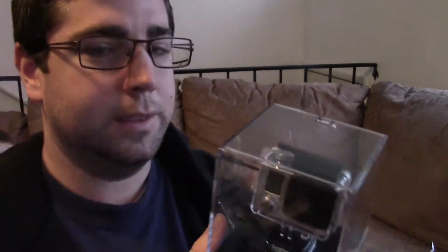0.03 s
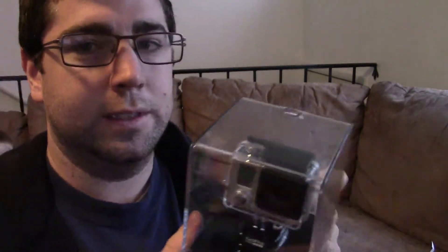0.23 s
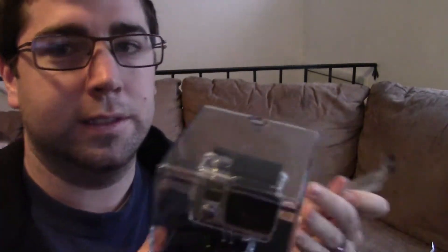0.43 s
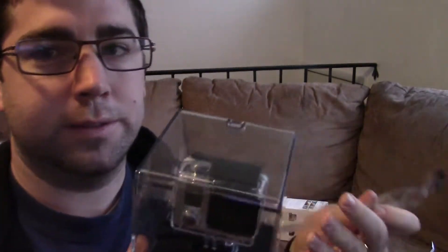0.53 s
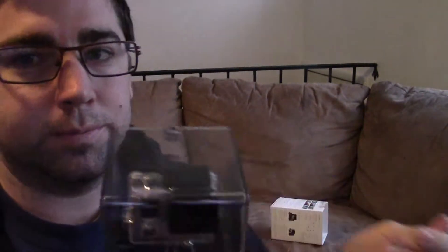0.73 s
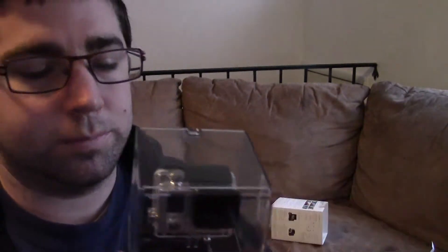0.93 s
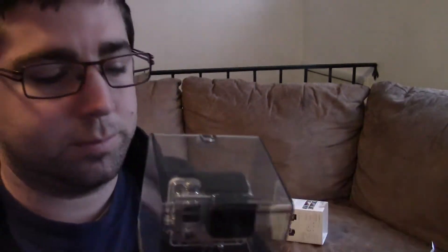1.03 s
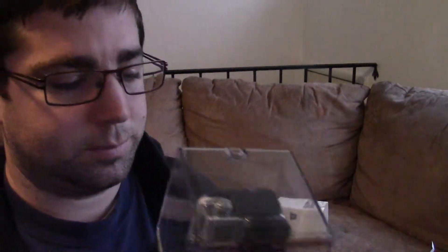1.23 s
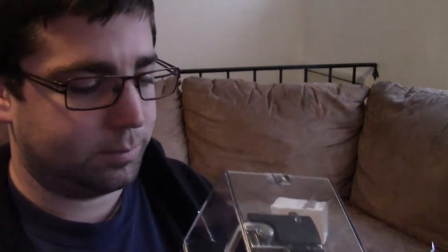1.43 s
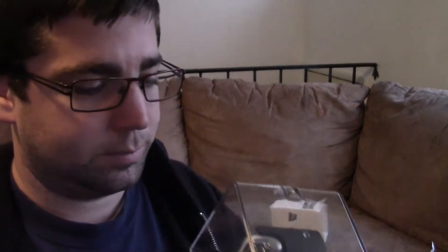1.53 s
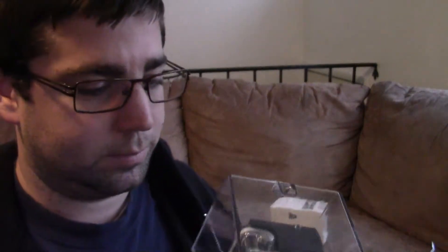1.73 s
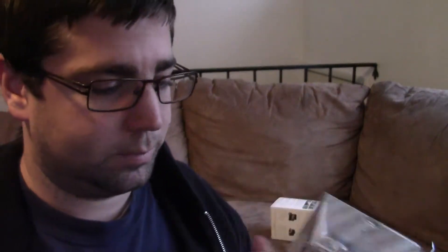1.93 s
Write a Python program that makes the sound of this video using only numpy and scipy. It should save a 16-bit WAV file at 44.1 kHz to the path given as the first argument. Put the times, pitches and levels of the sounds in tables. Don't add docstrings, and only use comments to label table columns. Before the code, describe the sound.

Sticky tape tears off a hollow hard plastic case, close up in a quiet furnished room. Faint ticks and rubbing lead to two crackling, drumming pulls at 0.23-0.37 and 0.40-0.60 seconds. The hardest, brightest rip comes at 0.73-0.82, then a loud hollow knock at 0.85 and smaller ones. A sharp tick at 1.07, sparse clicks, a ringing tap near 1.59 and faint touches follow over soft room air.

```python
import sys
import numpy as np
from scipy import signal
from scipy.fft import rfft, irfft
from scipy.io import wavfile

SR = 44100
rng = np.random.default_rng(int(sys.argv[2]) if len(sys.argv) > 2 else 0)


def transcribe(u):
    v = np.clip(np.atleast_2d(u).T, -1, 1)
    q = np.round(v * 32767).astype(np.int16)
    wavfile.write(sys.argv[1], SR, q)


def voltage_ratio(decibels):
    exponent = np.asarray(decibels, float) / 20
    return 10 ** exponent


N = 88200


def along(points, hz):
    f, v = np.transpose(points)
    return np.interp(np.log(hz + 1), np.log(f + 1), v)


def unit(x):
    return x / np.sqrt(np.mean(x ** 2) + 1e-20)


def colour(x, points):
    gain = voltage_ratio(along(points, np.fft.rfftfreq(4096, 1 / SR)))
    cepstrum = irfft(np.log(gain + 1e-6))
    cepstrum[1:2048] *= 2
    cepstrum[2049:] = 0
    impulse = irfft(np.exp(rfft(cepstrum)))
    return signal.fftconvolve(x, impulse)[:N]


def control(rows, level_db):
    time_s = np.asarray(rows)[:, 0] if not isinstance(rows, list) else np.array([r[0] for r in rows])
    return voltage_ratio(np.interp(np.arange(N) / SR, time_s, level_db, left=-120, right=-120))


def grains(rate_per_s, spread_db):
    hit = rng.random(N) < rate_per_s / SR
    size = voltage_ratio(spread_db * rng.standard_normal(N))
    return unit(hit * rng.choice([-1, 1], size=N) * size)


def crackle(rate_per_s, tone):
    t = np.arange(SR // 200) / SR
    decay = voltage_ratio(-60 * t / 0.005)
    sprays = np.convolve(np.abs(grains(rate_per_s, 4)), decay)[:N]
    return unit(colour(sprays * rng.standard_normal(N), tone))


# pitch_hz, level_db, t60_s
CASE_MODES = [(309, 7.5, .07), (363.6, 9.5, 0.1), (454.5, 10, 0.13), (616, 5.5, 0.13), (795, -5.5, 0.027),
              (880, -10.5, 0.046), (1180, -24.5, 0.039), (1540, 2, .025), (2200, -5.5, .015)]


def ring(tilt_db_per_octave, scatter_db):
    t = np.arange(SR // 5) / SR
    x = np.zeros(len(t))
    for k, (hz, db, t60_s) in enumerate(CASE_MODES):
        tilt_db = tilt_db_per_octave * np.log2(hz / 500)
        level_db = db + tilt_db + scatter_db * rng.standard_normal()
        x += (-1) ** k * voltage_ratio(level_db - 60 * t / t60_s) * np.sin(2 * np.pi * hz * t)
    return x / np.linalg.norm(x)


# freq_hz, gain_db
WALL_GAIN = [(60, -20.5), (200, -6.5), (300, 0.5)]


def thin_walls(x):
    return colour(x, WALL_GAIN)


# freq_hz, level_db_per_hz
AIR_COLOUR = [(20, -64.5), (55, -27.5), (134, -16), (285, -12), (1070, -15.5), (2000, -17), (4000, -33),
              (9000, -41), (16000, -51.5)]
# freq_hz, likeness
AIR_LIKENESS = [(60, 0.88), (240, 0.96), (950, 0.98), (3770, 0.93), (15000, 0.43)]
# time_s, level_db
AIR_SETTLE = [
    (0, 1.74),
    (1.62, -0.94),
    (1.75, -4),
    (2.1, -2),
]


def air():
    pair = np.array([unit(colour(v, AIR_COLOUR)) for v in rng.standard_normal((2, N))])
    likeness = along(AIR_LIKENESS, np.fft.rfftfreq(N, 1 / SR))
    turn = np.arccos(np.clip(likeness, -1, 1)) / 2
    mid, side = irfft(rfft(pair) * [np.cos(turn), np.sin(turn)], N)
    level = voltage_ratio(-51) * control(AIR_SETTLE, np.transpose(AIR_SETTLE)[1])
    return level * np.array([mid + side, mid - side])


def fidget():
    touches = grains(120, 2.5)
    return voltage_ratio(-59) * thin_walls(signal.fftconvolve(touches, ring(-1.5, 0))[:N])


# start_s, peak_db, pitch_hz
TICK_EVENTS = [(0.0356, -44, 4200), (0.0768, -41.5, 3520), (.094, -41.5, 7500), (.16, -44.5, 7500),
               (1.0713, -20.5, 8220), (1.0712, -25.5, 12500), (1.083, -37.5, 5380), (1.112, -38, 3480),
               (1.1197, -31, 6840), (1.165, -38, 6120), (1.172, -40, 4030), (1.189, -40.5, 7260),
               (1.3217, -40.5, 7140), (1.34, -41.5, 7100), (1.3495, -40, 6660), (1.37, -44, 6950),
               (1.385, -36, 6730), (1.396, -34.5, 7160), (1.359, -43, 9000), (1.473, -46, 6000),
               (1.5087, -33, 5600), (1.582, -41, 3670), (1.591, -44, 3020), (1.62, -33, 7010),
               (1.635, -37, 2840), (1.843, -46.5, 2777), (1.994, -39.5, 7000)]


def ticks():
    thin_hz, t60_s, flake_cycles = 5000, 0.0034, 6.7
    out, t = np.zeros(N + SR), np.arange(SR // 50) / SR
    for start_s, peak_db, hz in TICK_EVENTS:
        flake = np.sin(2 * np.pi * hz * t) * voltage_ratio(-60 * t * hz / flake_cycles)
        if hz <= thin_hz:
            flake = np.convolve(flake, flake)
        burst = rng.standard_normal(len(t)) * voltage_ratio(-60 * t / t60_s)
        crack = np.convolve(burst, flake)[:len(t)]
        out[round(start_s * SR):][:len(t)] += voltage_ratio(peak_db) * crack / np.abs(crack).max()
    return out[:N]


# start_s, length_s, level_db
RUB_STROKES = [
    (0.178, 0.16, -48),
    (0.63, 0.37, -46),
    (0.924, 0.31, -59.5),
    (1.15, 0.48, -66.5),
    (1.151, 0.029, -52.5),
    (1.299, .12, -65),
    (1.452, 0.1008, -70),
    (1.558, 0.11, -54.5),
    (1.982, .06, -53.5),
]
# freq_hz, level_db_per_hz
SKIN_COLOUR = [(1470, -37), (2500, 8), (5650, -2), (6450, 1), (8080, -2.5), (10900, -3.5), (16000, -14.5)]


def rubbing():
    now_s, strokes = np.arange(N) / SR, np.zeros(N)
    for start_s, length_s, level_db in RUB_STROKES:
        progress = np.clip((now_s - start_s) / length_s, 0, 1)
        strokes += voltage_ratio(level_db) * np.sin(np.pi * progress)
    return strokes * crackle(4000, SKIN_COLOUR)


# time_s, crackle_db, drumming_rel_db
PULL_LEVELS = [
    [(.2345, -21, -17), (.25, -16.5, -8), (.315, -22, -8), (.342, -27.5, -10.5), (.37, -38, -5)],
    [(.3955, -16.5, -17), (.445, -26.5, 5), (.535, -20, -6.5), (.562, -29, -17.5), (.6, -37.5, -5.5)],
    [(.7315, -25, 0.5), (.745, -16, -14), (.758, -18.5, -12.5), (.768, -12.5, -19), (.795, -10, -13.5),
     (.808, -12, -15), (.818, -22, -7), (.85, -46.5, 11)],
]
# start_s, level_db
FIRST_SLIPS = [(0.2394, -13), (0.247, -15), (0.2559, -30), (0.2592, -8), (0.2699, -15.5), (0.2746, -17),
               (0.2775, -17.5), (0.2804, -25.5), (0.2835, -20), (0.287, -12), (0.2896, -21), (0.2946, -12),
               (0.305, -26.5), (0.3078, -17.5), (0.3106, -22.5), (0.3226, -26.5), (0.328, -19.5),
               (0.332, -17.5), (0.3354, -20.5), (0.3389, -18.5)]
SECOND_SLIPS = [(0.3969, -18), (0.402, -30.5), (0.4048, -23), (0.4077, -22), (0.4153, -15), (0.4193, -25.5),
                (0.4308, -25), (0.4375, -16.5), (0.4431, -18.5), (0.4555, -18.5), (0.4605, -26),
                (0.4666, -15), (0.4715, -20.5), (0.4742, -22.5), (0.481, -20.5), (0.4854, -16.5),
                (0.4895, -14.5), (0.497, -17.5), (0.5009, -15.5), (0.506, -22.5), (0.5108, -11.5),
                (0.5158, -17.5), (0.5205, -19), (0.5223, -14.5), (0.527, -15), (0.5337, -19),
                (0.5373, -16.5), (0.5438, -22), (0.5484, -13), (0.5557, -17.5)]
LAST_SLIPS = [(0.7318, -12), (0.736, -13.5), (0.7396, -11), (0.7443, -14), (0.7454, -12.5), (0.749, -13.5),
              (0.7545, -12.5), (0.7566, -16.5), (0.759, -17), (0.7663, -6), (0.7699, -3.5), (0.7751, -2),
              (0.7826, -8), (0.785, -7.5), (0.79, -12.5), (0.7955, -10), (0.8002, -14.5), (0.8052, -15.5),
              (0.805, -16), (0.812, -20), (0.8118, -16), (0.8195, -27.5)]
# freq_hz, level_db_per_hz
FIRST_TONE = [(230, -27), (410, -12.5), (700, -1.5), (898, -8.5), (1460, -6.5), (7990, -11.5),
              (13500, -21.5), (16000, -38.5)]
SECOND_TONE = [(410, -36), (700, -3), (2020, -10), (2590, -0.5), (4610, -9.5), (6830, -3.5), (16000, -26)]
LAST_TONE = [(410, -43.5), (700, -11.5), (2160, -5.5), (3100, -3.5), (5840, -6), (8210, 1), (13300, -7),
             (16000, -19.5)]
# slip_db, crackle_db, grains_per_s, fizz_db, drum_tilt_db_per_octave
GLUE_MIX = [
    (2, -7.5, 2400, -14.5, -5.5),
    (3, -8, 2400, -11, 2.6),
    (0, -7, 54000, -8, -7.2),
]


def tape():
    slip_t60_s, slip_rise_s, drum_per_s, drum_db = 0.011, 0.00035, 810, -8
    out, t = np.zeros(N), np.arange(SR // 20) / SR
    slip_shape = voltage_ratio(-60 * t / slip_t60_s) * (1 - np.exp(-t / slip_rise_s))
    all_slips = (FIRST_SLIPS, SECOND_SLIPS, LAST_SLIPS)
    tones = (FIRST_TONE, SECOND_TONE, LAST_TONE)
    for rows, slips, tone, glue in zip(PULL_LEVELS, all_slips, tones, GLUE_MIX):
        slip_db, crackle_db, grains_per_s, fizz_db, tilt_db = glue
        level_db, drum_rel_db = np.transpose(rows)[1:]
        starts = np.zeros(N)
        for start_s, db in slips:
            starts[round(start_s * SR)] = voltage_ratio(db + slip_db)
        out += np.convolve(starts, slip_shape)[:N] * unit(colour(rng.standard_normal(N), tone))
        out += control(rows, level_db + crackle_db) * crackle(grains_per_s, FIRST_TONE)
        out += control(rows, level_db + fizz_db) * crackle(grains_per_s, tone)
        pushes = control(rows, level_db + drum_rel_db + drum_db) * grains(drum_per_s, 3)
        out += signal.fftconvolve(pushes, ring(tilt_db, 0))[:N]
    return out


def wall_modes(blows):
    out, t = np.zeros(N + SR), np.arange(SR // 4) / SR
    for start_s, peak_db, hz, t60_s, rise_s in blows:
        envelope = voltage_ratio(peak_db - 60 * t / t60_s) * (1 - np.exp(-t / rise_s))
        out[round(start_s * SR):][:len(t)] += envelope * np.sin(2 * np.pi * hz * t)
    return out[:N]


# start_s, peak_db, pitch_hz
TUG_EVENTS = [(.237, -24, 630), (.245, -23.5, 688), (.258, -24.5, 728), (.270, -29.5, 750),
              (.281, -21.5, 690), (.292, -24.5, 366), (.307, -18, 670), (.328, -17, 760), (.399, -18, 620),
              (.411, -22, 690), (.430, -22.5, 402), (.443, -20.5, 470), (.466, -21, 434), (.480, -21, 498),
              (.497, -21, 416), (.511, -21.5, 507), (.524, -19, 444), (.537, -22.5, 398), (.550, -26, 485),
              (.734, -20, 422), (.758, -21, 457), (.801, -19.5, 505), (.810, -18, 892)]


def tugs():
    t60_s, rise_s, gain_db = 0.043, 0.00086, 0.5
    return wall_modes([(s, db + gain_db, hz, t60_s, rise_s) for s, db, hz in TUG_EVENTS])


# start_s, peak_db, thud_hz
KNOCK_EVENTS = [(0.6347, -34.5, 428), (0.6508, -38, 377), (0.8355, -19, 402), (0.8499, -8.5, 560),
                (0.858, -27, 507), (0.8652, -37, 480), (0.8809, -22, 530), (.897, -23, 806),
                (.9035, -21.5, 393), (0.9138, -26.5, 620), (0.9299, -38, 355), (0.9459, -36.5, 474),
                (0.9752, -32.5, 397), (1.1745, -35.5, 601), (1.185, -41, 612), (1.3548, -39, 570),
                (1.4867, -45.5, 440), (1.571, -33.5, 763), (1.588, -23, 600), (1.6107, -29, 457),
                (1.625, -32.5, 880), (1.638, -37, 592), (1.7706, -41, 530), (1.841, -38.5, 499),
                (1.9575, -43.5, 600)]


def knocks():
    t60_s, rise_s, scuff_db, ring_db = 0.026, 0.0012, 6.5, 13
    out, t = np.zeros(N + SR), np.arange(SR // 5) / SR
    decay, rise = voltage_ratio(-60 * t / t60_s), 1 - np.exp(-t / rise_s)
    for start_s, peak_db, hz in KNOCK_EVENTS:
        thud = 2 * np.sin(2 * np.pi * hz * t) * decay
        dull = np.convolve(rng.standard_normal(len(t)), np.hanning(28) / 10, "same")
        scuff = dull * voltage_ratio(scuff_db) * decay
        ringing = voltage_ratio(ring_db) * ring(-1.5, 4)
        out[round(start_s * SR):][:len(t)] += voltage_ratio(peak_db) * rise * (thud + scuff + ringing)
    return out[:N]


# start_s, peak_db, pitch_hz, t60_s
PANEL_EVENTS = [(0.7307, -9.5, 8570, 0.013), (0.7371, -4.5, 8210, 0.0074), (0.8497, -21.5, 147, 0.088),
                (.898, -27.5, 1514, 0.026), (1.0718, -32, 5300, 0.01), (1.0712, -23, 7840, 0.0062),
                (1.5081, -27.5, 2660, 0.0065), (1.5079, -31.5, 3730, 0.01), (1.572, -33.5, 275, .1),
                (1.5887, -23, 448, 0.099), (1.5875, -18.5, 898, 0.029), (1.5885, -32.5, 710, .03),
                (1.5901, -29, 1450, .03), (1.5885, -34, 2080, 0.026), (1.5875, -34.5, 2500, 0.022),
                (1.589, -30.5, 2961, 0.013), (1.5885, -46, 3370, .018), (1.5897, -39, 3677, 0.022),
                (1.613, -34.5, 272, 0.12), (1.62, -32.5, 2790, 0.017), (1.771, -36, 265, .09),
                (1.771, -43.5, 538, 0.054), (1.842, -35, 276, 0.14), (1.842, -34.5, 598, 0.073),
                (1.841, -41.5, 410, 0.051), (1.957, -47, 1200, .03)]


def panels():
    rise_cycles = 0.82
    return wall_modes([(s, db, hz, t60_s, rise_cycles / hz) for s, db, hz, t60_s in PANEL_EVENTS])


# freq_hz, t60_s
ROOM_DECAY = [(200, 0.32), (1000, 0.35), (4000, 0.4), (12000, 0.16)]


def room(x):
    width, delay_samples = 0.18, 120
    hz, t, z = signal.stft(rng.standard_normal((2, SR // 2)), SR, nperseg=256)
    decay = voltage_ratio(-60 * t / along(ROOM_DECAY, hz)[:, None])
    mid, side = signal.istft(z / np.abs(z) * decay, SR, nperseg=256)[1]
    tail = np.array([mid + width * side, mid - width * side]) / np.linalg.norm(mid)
    return signal.fftconvolve(np.pad(x, (delay_samples, 0))[None], tail, axes=1)[:, :N]


# freq_hz, side_db
BODY_SCATTER = [(150, -10.5), (450, -27), (1200, -18), (2500, -24.5), (5000, -14.5), (9000, -15.5),
                (15000, -7)]


def scene():
    pan_db, room_db = -0.3, -12.5
    near = thin_walls(ticks() + rubbing() + tape() + tugs() + knocks() + panels())
    scatter = rng.standard_normal(SR // 80)
    side = colour(np.convolve(near, scatter / np.linalg.norm(scatter))[:N], BODY_SCATTER)
    direct = np.array([near * voltage_ratio(pan_db) + side, near * voltage_ratio(-pan_db) - side])
    return direct + voltage_ratio(room_db) * room(near) + air() + fidget()


def low_pass(x):
    return signal.sosfilt(signal.butter(12, 16550, fs=SR, output="sos"), x)


def record(dry):
    ceiling, knee, top_hz = 0.92, 4, 15950
    soft = dry / (1 + np.abs(dry / ceiling) ** knee) ** (1 / knee)
    mix = irfft(rfft(soft) * (np.fft.rfftfreq(N, 1 / SR) < top_hz), N)
    return low_pass(mix)


dry = scene()
out = record(dry)
transcribe(out)
```